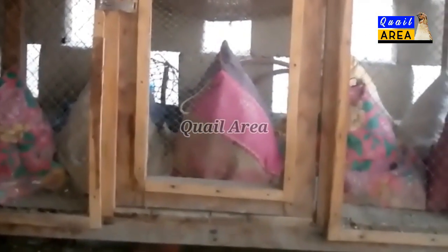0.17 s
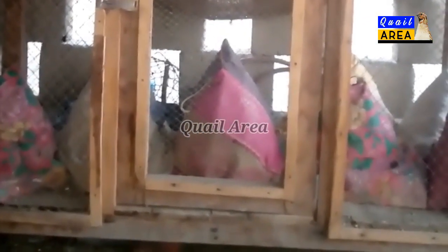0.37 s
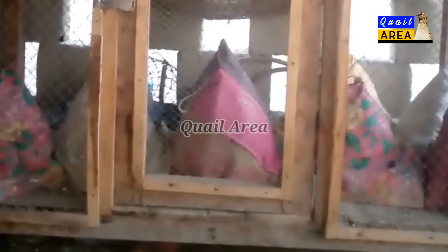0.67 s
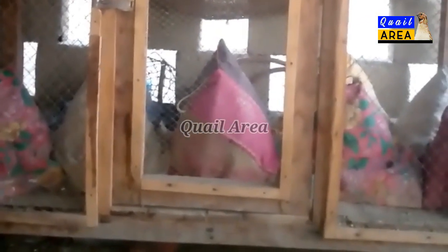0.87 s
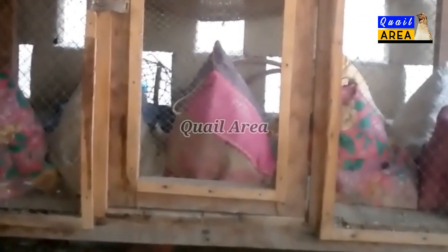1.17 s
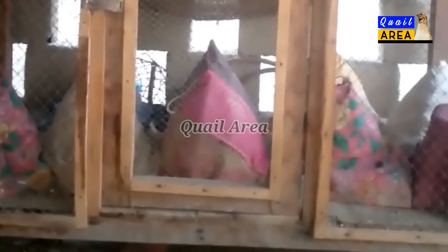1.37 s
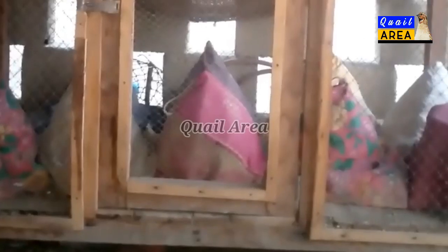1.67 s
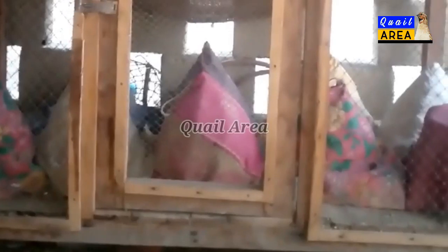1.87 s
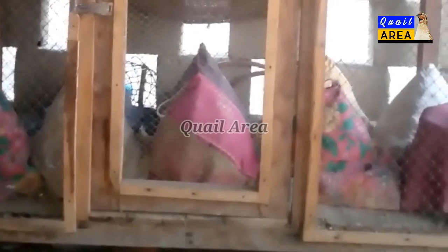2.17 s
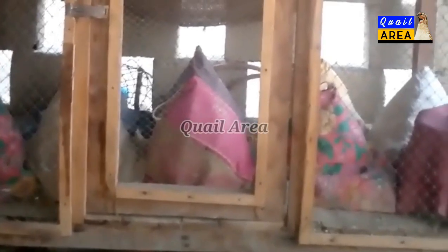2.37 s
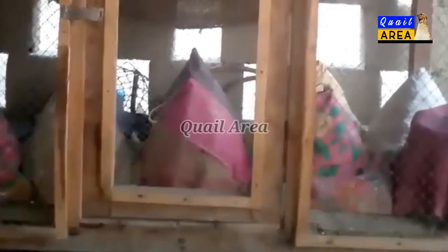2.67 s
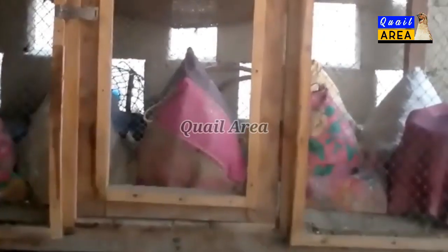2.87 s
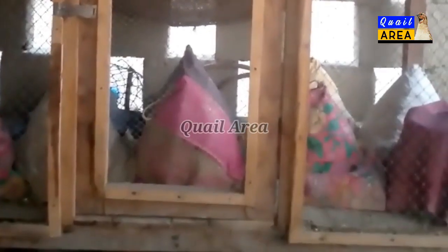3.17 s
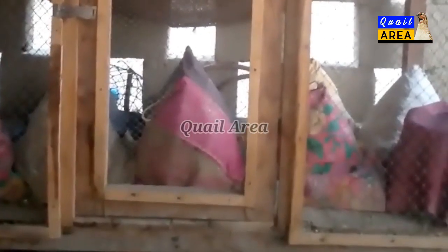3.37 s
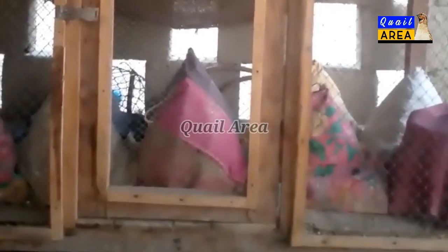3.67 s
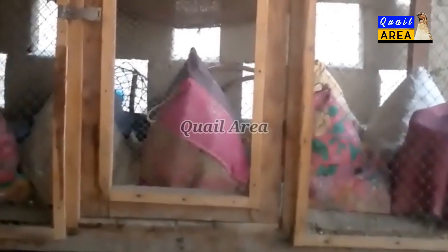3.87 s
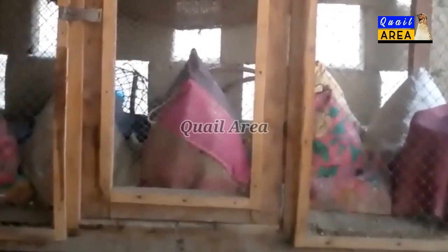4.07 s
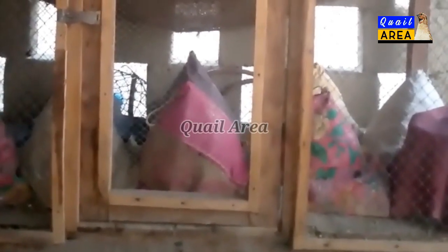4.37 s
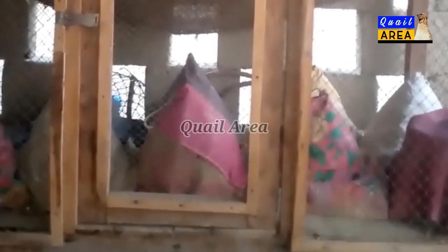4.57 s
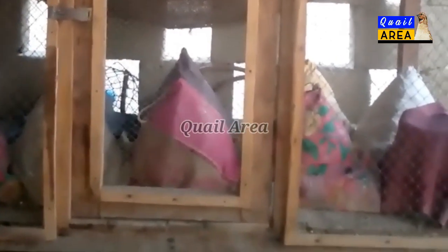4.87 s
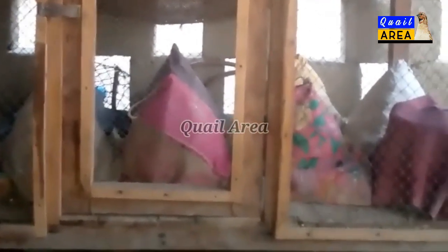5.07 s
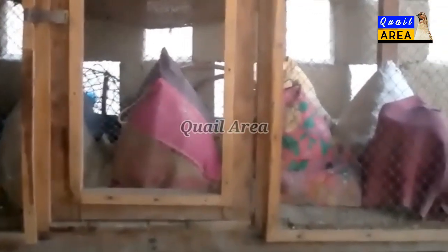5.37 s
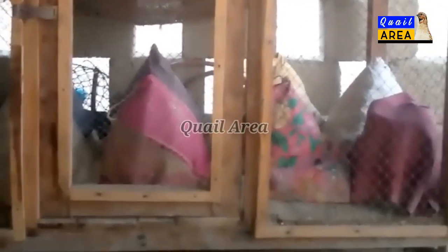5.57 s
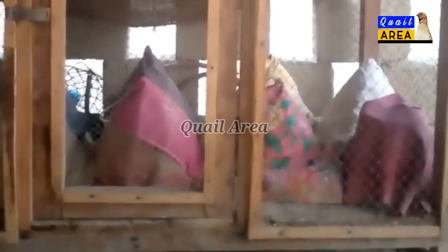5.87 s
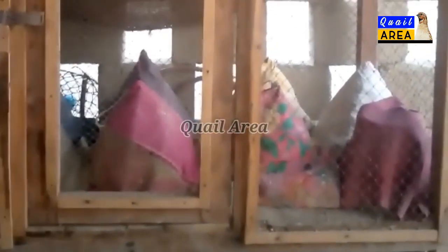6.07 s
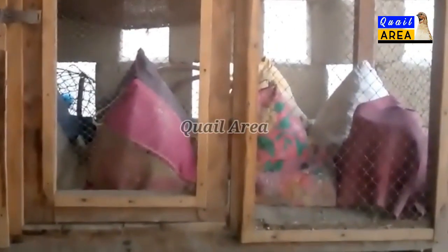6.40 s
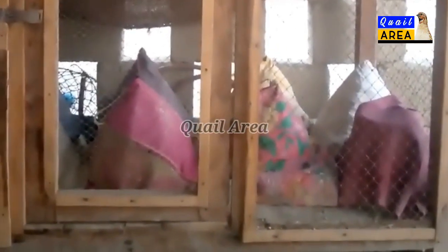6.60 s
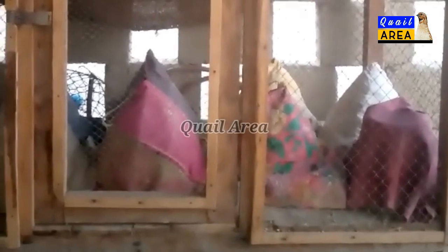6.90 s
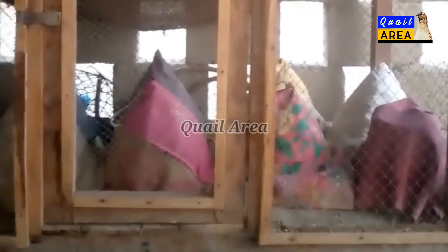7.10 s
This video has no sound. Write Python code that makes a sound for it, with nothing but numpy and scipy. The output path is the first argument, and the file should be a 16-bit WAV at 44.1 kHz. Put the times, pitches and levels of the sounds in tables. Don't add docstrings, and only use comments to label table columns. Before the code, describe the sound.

Close, piercing quail whistles overlap in quick bursts, joined later by rough rolling growls about once a second, with dull wooden knocks and faint chirps.

```python
import sys
import numpy as np
from scipy import signal
from scipy.io import wavfile
from scipy.ndimage import uniform_filter1d

SR = 44100
rng = np.random.default_rng(int(sys.argv[2]) if len(sys.argv) > 2 else 0)


def volts(x):
    e = np.asarray(x, float) / 20
    return 10 ** e


def generate_wav(signal):
    frames = np.transpose(np.atleast_2d(signal))
    scaled = np.clip(frames, -1, 1) * 32767
    pcm = np.round(scaled).astype(np.int16)
    wavfile.write(sys.argv[1], SR, pcm)


N = 319284

# (flick time [s], held length [s], first pitch [Hz], last level [dB], swell [dB])
HIGH_WHISTLES = [(0.08, .069, 3255, -14, -4), (0.3115, 0.046, 3313, -13.5, -10),
                 (0.8369, .073, 3090, -12.5, 10), (1.5681, 0.065, 3402, -14.5, -4),
                 (1.798, 0.059, 3245, -12.5, 14), (1.8389, 0.051, 3178, -12.5, 10),
                 (1.9083, 0.052, 3316, -12.5, -2.5), (2.2005, 0.062, 3194, -11, -1),
                 (3.0696, .07, 3475, -13.5, 5), (3.1098, 0.035, 3339, -15, -4),
                 (3.2808, .079, 3527, -10.5, 2), (3.3333, .055, 3196, -12, 5.5),
                 (3.5691, 0.065, 3198, -10, 1.5), (4.5926, 0.07, 3388, -11, -1.5),
                 (4.6482, 0.028, 3432, -12, -6), (4.8139, 0.047, 3260, -13, -5.5),
                 (4.939, .064, 3202, -11.5, -1.5), (6.0237, 0.087, 3697, -11, 7.5),
                 (6.0742, .058, 3317, -12.5, 6.5), (6.3017, .047, 3267, -9, -4)]


def evened(x):
    return x / np.sqrt(np.mean(x ** 2) + 1e-20)


def read(points, hz):
    f, value = np.transpose(points)
    return np.interp(np.log(hz + 1), np.log(f + 1), value)


def add(mix, s, sound):
    part = mix[max(round(s * SR), 0):][:len(sound)]
    part += sound[:len(part)]


def resonate(x, hz, width):
    turn = np.exp(2j * np.pi * np.cumsum(hz * np.ones(len(x))) / SR)
    r = np.exp(-np.pi * width / SR)
    return 2 * (turn * signal.lfilter([1 - r], [1, -r], x / turn + 1e-18)).real


def echoes(early_db, count):
    # (frequency [Hz], t60 [s])
    decay = [(300, 0.18), (2000, 0.17), (4000, 0.23), (7000, 0.26), (12000, 0.15)]
    taps = np.zeros((count, SR // 3))
    at = np.arange(80, taps.shape[1] - 20, 20)
    at = at + rng.integers(0, 20, (count, len(at)))
    np.put_along_axis(taps, at, rng.choice([-1., 1.], at.shape), axis=1)
    taps *= 1 + volts(early_db - 400 * np.arange(taps.shape[1]) / SR)
    hz, t, z = signal.stft(taps, SR, nperseg=128)
    tails = signal.istft(z * volts(-60 * t / read(decay, hz)[:, None]), SR, nperseg=128)[1]
    return tails / np.linalg.norm(tails, axis=1, keepdims=True)


def shed(x, early_db):
    return signal.oaconvolve(x, echoes(early_db, count=1)[0])[:N]


def bumps():
    # (time [s], peak level [dB], t60 [s], extra level of the deepest board [dB])
    blows = [(0.0, -38.5, 0.7, -8.5), (1.145, -39.5, 0.27, 2.5), (1.212, -41.5, 0.25, 2.5),
             (1.279, -44.5, 0.72, 13), (3.099, -35, 0.16, 0.5), (4.792, -63.5, 0.14, -16),
             (4.92, -41, 1, -19), (4.955, -24, 0.29, 9), (4.999, -31.5, 0.69, 10.5),
             (5.029, -30.5, 0.33, 1.5), (5.082, -23, 0.22, -13.5), (5.156, -34.5, 0.78, -1.5),
             (5.217, -54, 0.1, -11), (5.44, -39, 0.33, -2.5), (6.152, -26, 0.61, -26),
             (6.201, -38.5, 0.44, -24)]
    # (frequency [Hz], width [Hz], level [dB])
    boards = [(110, 35, -3), (203, 47, 2.5), (237, 10, -13), (312.2, 63, -6.5), (520, 220, -28.5)]
    knock = 2.5
    scuff_share = 0.93
    deep, push, scuff = np.zeros((3, N))
    t = np.arange(SR // 2) / SR
    for s, db, t60, deep_db in blows:
        onset = np.minimum(t / 0.0034, 1) * (1 + knock * np.exp(-t / 0.011))
        blow = volts(db - 60 * t / t60) * onset * rng.standard_normal(len(t))
        add(deep, s, volts(deep_db) * blow)
        add(push, s, blow)
        add(scuff, s, blow * volts(-60 * t / (scuff_share * t60)))
    rings = np.zeros(N)
    for k, (hz, width, db) in enumerate(boards):
        drive = deep if k == 0 else push
        rings += volts(db) * resonate(resonate(drive, hz, 2 * width), hz, 2 * width)
    return volts(17.0) * rings + volts(-4.5) * resonate(resonate(scuff, 730, 1600), 730, 1600)


def wash(spectrum, patchy_db):
    a, b, patches = rng.standard_normal((N // 128 + 5, 257, 3)).T
    patches = uniform_filter1d(uniform_filter1d(patches, size=5, axis=0), size=20, axis=1)
    shape_db = read(spectrum, np.fft.rfftfreq(512, 1 / SR))[:, None]
    z = (a + 1j * b) * volts(shape_db + patchy_db * evened(patches))
    return evened(signal.istft(z, nperseg=512, noverlap=384)[1][:N])


def room_air():
    # (frequency [Hz], density [dB per Hz])
    spectrum = [(18, -65), (30, -10.5), (249, -7.5), (1130, -19), (2900, -15), (3400, -10), (6200, -22.5),
                (7840, -39), (11900, -45), (12900, -28.5), (15500, -50)]
    return volts(-52 + 6) * wash(spectrum, patchy_db=2.0)


def bursts(t, s, db, fall_db_per_s):
    rise_db_per_s = 383
    late = t - np.asarray(s)[:, None]
    swell_db = np.minimum(rise_db_per_s * late, -fall_db_per_s * late)
    return volts(np.asarray(db)[:, None] + swell_db) ** 2


def far_cages():
    # (time [s], level [dB], centre [Hz])
    far_calls = [(.0, -42, 3290), (0.46, -44.5, 3400), (0.931, -42, 3306), (1.311, -44.5, 4430),
                 (1.388, -42.5, 3685), (1.479, -45, 6080), (2.502, -49.5, 4530), (2.622, -50.5, 3620),
                 (2.859, -63.5, 5910), (3.87, -51, 6020), (4.27, -44, 3020), (4.45, -37.5, 3210),
                 (5.22, -51, 3690), (5.482, -42, 3974), (5.542, -45, 3503), (5.75, -46.5, 3610),
                 (6.529, -41.5, 4033), (6.598, -46.5, 3403), (7.2, -45, 3383)]
    # (frequency [Hz], density [dB per Hz])
    high_spectrum = [(1800, -35.5), (2600, -23), (3300, -7.5), (6300, -7), (7200, -21), (10000, -59.5)]
    # (frequency [Hz], density [dB per Hz])
    low_spectrum = [(410, -53), (700, -33), (862, -9), (1070, -17), (1420, 2), (1950, -10.5), (2600, -29.5),
                    (3380, -41.5), (5720, -120)]
    linger_db, linger_hz, lull_db, patchy_db = -21, 3300, -63, 4.0
    t = np.arange(0, N / SR, .005)
    s, db, hz = np.transpose(far_calls)
    high = np.transpose(HIGH_WHISTLES)
    calls = bursts(t, s, db, fall_db_per_s=105.5)
    linger = bursts(t, high[0], high[3] + linger_db, fall_db_per_s=75.5).sum(0) + volts(lull_db) ** 2
    centre_hz = (hz @ calls ** 2 + linger_hz * linger ** 2) / ((calls ** 2).sum(0) + linger ** 2)
    gain = np.sqrt(calls.sum(0) + linger)
    gain, centre_hz = (np.interp(np.arange(N) / SR, t, c) for c in (gain, centre_hz))
    blur = wash(high_spectrum, patchy_db)
    coloured = resonate(resonate(blur, centre_hz, 1400), centre_hz, 1400)
    return gain * evened(0.15 * blur + coloured) + volts(-74.5) * wash(low_spectrum, patchy_db)


def whistles(rows, flick, tone, hold, wall_db=-60):
    wall_s = .0115
    settle = .45
    thin_db_per_octave = 10.5
    second_db, third_db, direct_db, shed_db, share, early_db = tone
    after, flick_hz, flick_db = np.transpose(flick)
    out = np.zeros(N)
    tails = volts(shed_db) * echoes(early_db, count=6)
    tails[:, 0] += volts(direct_db)
    tails[:, round(wall_s * SR)] += volts(direct_db + wall_db)
    for k, (s, held, first_hz, last_db, swell_db) in enumerate(rows):
        lead = min(held + 0.0069, s)
        first_db = last_db - swell_db
        middle_hz = hold[0] + hold[1] * (first_hz - hold[0])
        middle_db = first_db + share * swell_db
        t = np.arange(-lead, after[-1], 1 / SR)
        start = .007 - held
        knots = np.r_[-lead, start, start + settle * (after[0] - start), after]
        hz = np.interp(t, knots, np.r_[first_hz, first_hz, middle_hz, flick_hz])
        db = np.interp(t, knots, np.r_[first_db - 18, first_db, middle_db, last_db + flick_db])
        turn = 2 * np.pi * np.cumsum(uniform_filter1d(hz, size=60)) / SR
        thin = volts(-thin_db_per_octave * np.maximum(np.log2(hz / flick_hz[1]), 0))
        overtones = volts(second_db) * np.sin(2 * turn) + volts(third_db) * np.sin(3 * turn)
        note = np.sin(turn) + thin * overtones
        note = np.sqrt(2) * volts(uniform_filter1d(db, size=40)) * note * signal.windows.tukey(len(t), .05)
        add(out, s - lead, signal.fftconvolve(note, tails[k % len(tails)]))
    return out


def swelling(rows, swell):
    return [(*row, swell[0] + swell[1] * row[1]) for row in rows]


def high_whistles():
    # (time from its centre [s], pitch [Hz], level from the held note [dB])
    flick = [(-.018, 3340, -6.5), (-.010, 3476, 3.5), (-.005, 3540, -3.5), (0, 4280, -4), (.004, 6070, -3),
             (.009, 6596, -17), (0.016, 6930, -12)]
    # (flick time [s], held length [s], first pitch [Hz], last level [dB], swell [dB])
    farther = [(.1289, .039, 3180, -22.5, 1.5), (.3545, .038, 3117, -17.5, 15),
               (.5544, .078, 3520, -14.5, 10), (.652, 0.061, 3186, -42, 14.5),
               (1.6139, 0.063, 3375, -18, -7), (2.298, 0.021, 3315, -44, 12.5),
               (5.036, 0.064, 3184, -43, 2), (6.184, 0.035, 3126, -30, -10),
               (6.3274, 0.029, 3604, -14.5, 7), (7.177, .096, 3684, -16, 10)]
    # (time from its centre [s], pitch [Hz], level from the held note [dB])
    far_flick = [(-.018, 3310, 0), (-.010, 3250, 4), (-.005, 3570, 0), (0, 4713, -3.5), (.004, 5950, -4.5),
                 (.009, 6260, -11), (0.018, 6430, -30.5)]
    close = whistles(HIGH_WHISTLES, flick, (-27, -66, -4, -2.5, 1.21, 2), (3240, 0.14), wall_db=-7.5)
    return close + whistles(farther, far_flick, (-33, -59, -1, -2, 0.88, 5), (3150, 0.039))


def distant_calls():
    # (time [s], length [s], first pitch [Hz], throat [Hz], level [dB])
    calls = [(0.326, 0.087, 776, 765.7, -54), (1.671, 0.14, 705, 700, -50.5), (2.5, 0.17, 295, 1449, -52),
             (2.58, 0.15, 302, 712, -57), (2.829, .078, 392, 372, -56.5), (3.771, 0.21, 499, 1940, -49.5),
             (3.849, 0.12, 275, 265, -71.5), (4.444, 0.14, 505, 1370, -43), (4.909, 0.078, 1650, 1581, -48),
             (5.434, .25, 499, 1820, -43.5), (5.696, 0.1, 2930, 2790, -51),
             (6.828, 0.053, 2880, 2640, -40.5)]
    sag_per_s = 0.5
    out = np.zeros(N)
    for s, length, first_hz, throat_hz, db in calls:
        count = round(length * SR)
        waver = 1 + .03 * evened(uniform_filter1d(rng.standard_normal(count), size=200))
        hz = first_hz * np.linspace(1, 1 - sag_per_s * length, count) * waver
        turn = 2 * np.pi * np.cumsum(hz) / SR
        pulses = sum(np.cos(k * turn) for k in range(1, 8))
        pulses = pulses * (1 + .6 * rng.standard_normal(count))
        call = resonate(resonate(pulses, throat_hz, 1200), throat_hz, 1200)
        add(out, s, volts(db) * evened(call) * signal.windows.tukey(count, .6))
    return volts(-9) * out + shed(out, early_db=0)


def middle_whistles():
    # (flick time [s], held length [s], first pitch [Hz], last level [dB])
    firm = [(.7667, 0.03, 2224, -12.5), (1.5143, 0.023, 2141, -18), (1.9302, 0.037, 2331, -12.5),
            (3.4433, 0.05, 2305, -18.5), (4.0953, 0.018, 2350, -15), (4.5137, 0.034, 2127, -15),
            (5.193, 0.035, 2100, -16), (5.6092, 0.031, 2212, -14), (6.7435, 0.035, 2177, -14)]
    # (flick time [s], held length [s], first pitch [Hz], last level [dB])
    soft = [(.351, 0.028, 2030, -20.5), (.9907, 0.051, 2060, -22), (2.153, 0.035, 2144, -19),
            (3.6757, 0.039, 2053, -19.5), (4.7366, 0.041, 2045, -20.5), (5.826, 0.037, 2117, -23),
            (6.9622, 0.033, 2180, -24.5)]
    # (time from its centre [s], pitch [Hz], level from the held note [dB])
    flick = [(-.010, 2602, 4), (-.005, 2820, -4), (0, 3457, 2.5), (.003, 4610, -5.5), (.007, 4850, -5.5),
             (0.013, 4766, -19.5)]
    # (time from its centre [s], pitch [Hz], level from the held note [dB])
    soft_flick = [(-.010, 2581, 4), (-.005, 2734, 1), (0, 3360, 2), (.003, 4134, -4), (.007, 4750, -12.5),
                  (0.011, 4900, -28)]
    swell, hold = (-17, 800), (2300, 0.28)
    out = whistles(swelling(firm, swell), flick, (-28, -38.5, -1, -4.5, 1.0049, -6), hold)
    return out + whistles(swelling(soft, swell), soft_flick, (-37.5, -49, -2, -5.5, 1.1671, -8), hold)


def near_whistles():
    # (flick time [s], held length [s], first pitch [Hz], last level [dB], swell [dB])
    light = [
        (.707, 0.033, 1137, -11.5, 28),
    ]
    # (time from its centre [s], pitch [Hz], level from the held note [dB])
    light_flick = [(-.014, 1750, -11), (-.009, 1900, 2.5), (-.0055, 2050, 3), (-.0022, 2400, 0),
                   (0, 2900, 9.5), (.0015, 3600, 7.5), (.003, 4500, -16)]
    # (flick time [s], held length [s], first pitch [Hz], last level [dB])
    full = [(.9211, .034, 1400, -4.5), (1.0508, 0.029, 1308, -4), (1.743, .026, 1512, -4),
            (1.9484, 0.031, 1440, -2.5), (2.0775, 0.044, 1280, -2.5), (2.763, 0.024, 1517, -5.5),
            (2.973, .033, 1413, -2.5), (3.1004, 0.023, 1281, -0.5)]
    # (time from its centre [s], pitch [Hz], level from the held note [dB])
    flick = [(-.017, 1780, -9), (-.013, 1930, 2), (-.008, 2050, 4), (-.0045, 2200, 1), (-.0022, 2500, -13),
             (-.0008, 2900, 2), (.0012, 3650, 2), (.003, 4700, -16)]
    tone, hold = (-27.5, -55, -0.5, -17.5, 0.16, 28), (1780, .68)
    out = whistles(light, light_flick, tone, hold)
    return out + whistles(swelling(full, (21, 40)), flick, tone, hold)


def growls(rows, shape, apart, rough, mixing, throat_width, chest_db, shed_db, merged=0):
    joint_partials = [(2, 1, .7), (1, 2, .3), (2, 2, 1.), (3, 1, .4), (1, 4, .5)]
    open_hz = (1500, 2100)
    throb = .2
    spill_db = -12.5
    spread, chest_ratio = .15, 2.12
    out = np.zeros(N)
    u, *columns = np.transpose(shape)
    for s, longer, higher, level_db in rows:
        t = np.arange(0, u[-1] * longer, 1 / SR)
        hz, throat_hz, db = (uniform_filter1d(np.interp(t / longer, u, c), size=300) for c in columns)
        sides, turns = [], []
        for ratio in (higher, higher * apart):
            jitter = 1 + 0.012 * evened(uniform_filter1d(rng.standard_normal(len(t)), size=120))
            turn = 2 * np.pi * np.cumsum(hz * ratio * jitter) / SR
            turns.append(turn)
            sides.append(sum(np.cos(k * turn + spread * k * k) / np.sqrt(k) for k in range(1, 8)))
        sums = sum(w * np.cos(j * turns[0] + m * turns[1] + j * m) for j, m, w in joint_partials)
        drive = evened(sides[0] + sides[1] + merged * sums + mixing * sides[0] * sides[1])
        source = drive + rough * np.abs(drive) * rng.standard_normal(len(t))
        throat = source
        for _ in range(3):
            throat = resonate(throat, throat_hz, throat_width)
        opened = np.interp(throat_hz, open_hz, (0, 1))
        breath = np.abs(drive) * rng.standard_normal(len(t))
        spill = resonate(resonate(breath, 1.2 * throat_hz, 1400), 1.1 * throat_hz, 1400)
        pinch = 1 + throb * opened * np.cos(turns[1] - turns[0])
        throat = (throat + volts(spill_db) * opened * spill) * pinch
        chest = resonate(resonate(source, chest_ratio * hz, 690), chest_ratio * hz, 600)
        voice = evened(throat + volts(chest_db) * chest)
        add(out, s, volts(db + level_db) * voice * signal.windows.tukey(len(t), .05))
    return out + volts(shed_db) * shed(out, early_db=18.5)


def soft_rasps():
    # (time [s], length factor, pitch factor, level [dB])
    rasps = [(.787, 0.87, 1.23, -4), (3.465, 1.09, 1.08, -10.5), (4.535, 1.02, 1.15, -3),
             (5.63, 1.01, 1.3, -7.5), (6.762, 1.06, 1.04, -8.5)]
    # (time from its start [s], pitch [Hz], throat [Hz], level [dB])
    course = [(0, 637.7, 2377, -55), (0.019, 633.3, 1970, -28.5), (0.044, 623.5, 1522, -46.5),
              (.07, 680, 1268, -59.5), (.09, 693, 1382, -49), (.13, 692, 1450, -48.5),
              (0.154, 840, 1916, -34.5), (.17, 913, 2040, -44.5)]
    return growls(rasps, course, apart=1.03, rough=1.0, mixing=.1, throat_width=760,
                  chest_db=-26.0, shed_db=0.0)


def near_rasps():
    # (time [s], length factor, pitch factor, level [dB])
    rasps = [
        (.94, 1.06, 0.9, 4),
        (1.972, 1.004, 0.97, 6.5),
        (2.995, 1.01, 1.01, 8.5),
    ]
    # (time from its start [s], pitch [Hz], throat [Hz], level [dB])
    course = [(0, 519, 2948, -33.5), (0.014, 531, 2813, -25), (0.033, 580.6, 2150, -19.5),
              (0.051, 541.7, 1731, -23), (.068, 570, 1150, -27), (.08, 640, 1280, -31),
              (0.088, 694, 1400, -34)]
    return growls(rasps, course, apart=1.025, rough=.35, mixing=0.1, throat_width=560,
                  chest_db=-13, shed_db=-8.0)


def outside_chirps():
    # (time [s], length [s], first pitch [Hz], last pitch [Hz], level [dB])
    chirps = [(1.19, 0.026, 4620, 5340, -59), (2.375, .07, 3350, 2497, -58),
              (2.44, 0.095, 2455, 2200, -57.5), (2.6, .08, 2900, 3247, -53),
              (2.82, 0.12, 6480, 4610, -57.5), (3.76, 0.1, 5800, 4290, -55),
              (3.84, 0.018, 6500, 5360, -50.5), (3.89, 0.09, 6420, 5870, -60),
              (3.975, 0.052, 3633, 4226, -56.5), (5.74, 0.1, 6500, 4680, -57.5),
              (6.5, .04, 4900, 6020, -52), (6.78, .05, 6530, 6135, -52.5), (7.0, .09, 4800, 5420, -61)]
    out = np.zeros(N)
    for s, length, first_hz, last_hz, db in chirps:
        count = round(length * SR)
        chirp = resonate(rng.standard_normal(count), np.geomspace(first_hz, last_hz, count), 90)
        add(out, s, volts(db) * evened(chirp) * signal.windows.tukey(count, .5))
    return out + volts(-3) * shed(out, early_db=5)


def long_growls():
    # (time [s], length factor, pitch factor, level [dB])
    calls = [
        (3.11, 0.94, 0.91, -1.4),
        (4.07, 0.99, 0.99, 0.1),
        (5.045, 0.99, 1.032, 0.4),
        (6.055, 0.96, 1.01, 0.3),
        (7.075, 0.95, 1.02, 0.5),
    ]
    # (time from its start [s], pitch [Hz], throat [Hz], level [dB])
    course = [(0, 441.2, 1058, -45.5), (0.036, 461.1, 1150, -28.5), (0.084, 505, 2160, -22.5),
              (0.14, 533.5, 2200, -21.5), (0.161, 556.3, 1083, -26.5), (0.226, 592.7, 1250, -22.5),
              (.28, 598.2, 3040, -13.5), (.33, 564.9, 2274, -15.5), (0.374, 520, 1483, -24)]
    return growls(calls, course, apart=1.125, rough=.5, mixing=.3, throat_width=680,
                  chest_db=-10, shed_db=-13, merged=1.1)


def scene():
    background = room_air() + far_cages() + distant_calls() + outside_chirps()
    notes = high_whistles() + middle_whistles() + near_whistles()
    rough_voices = soft_rasps() + near_rasps() + long_growls()
    return (bumps() + background + notes + rough_voices)[None]


def shifting_bands(x):
    split_hz = 7200
    gate_db, gate_range_db = -9, 9
    wide_from_db = -51.5
    hush_db, hush_from_db = -8, -46
    hz, _, z = signal.stft(x, SR, nperseg=2048, noverlap=1536)
    treble = hz[:, None] > split_hz
    off_whine = abs(hz[:, None] - 12700) > 330
    power = np.abs(z) ** 2
    outline = np.sqrt(np.abs(uniform_filter1d(power, size=16, axis=0)))

    steady_db = 10 * np.log10(uniform_filter1d(outline ** 2, size=3, axis=1) + 1e-16)
    above_db = steady_db - np.percentile(steady_db[:, ::4], 15, axis=1)[:, None]
    z = z * volts(gate_db * np.clip(1 - above_db / gate_range_db, 0, 1.3) * off_whine)

    a, b = rng.standard_normal((z.shape[1], len(hz), 2)).T
    overload = 10 * np.log10(power[(hz > 1500) & (hz < 2500)].sum(0) + 1e-12) > -18
    bands_db = rng.uniform(-16, 0, (35, z.shape[1] // 4 + 1))
    bands_db = np.repeat(np.repeat(bands_db, 30, axis=0), 4, axis=1)
    outline = outline * volts(bands_db[:len(hz), :z.shape[1]])
    z = np.where(treble & overload, volts(10.0) * outline * (a + 1j * b), z)

    broad_db = 10 * np.log10(np.median(power[(hz > 900) & (hz < 3400)], 0) + 1e-14)
    dimmed = volts(-2.5 * np.maximum(broad_db - wide_from_db, 0) * ~overload)
    z = np.where(treble | (hz[:, None] < 420), z * dimmed, z)

    low_db = 10 * np.log10(power[(hz > 950) & (hz < 1400)].sum(0) + 1e-12)
    hushed = volts(hush_db * np.clip((low_db - hush_from_db) / 5, 0, 1) * ~overload)
    z = np.where(treble & off_whine, z * hushed, z)
    return signal.istft(z, SR, nperseg=2048, noverlap=1536)[1][:N]


def whine():
    # (frequency [Hz], level [dB])
    tones = [
        (12462, -71),
        (12909, -72.5),
    ]
    out = np.zeros(N)
    for hz, db in tones:
        fuzz = evened(resonate(rng.standard_normal(N), hz, 40))
        out += volts(db) * evened(np.sin(2 * np.pi * hz * np.arange(N) / SR) + .25 * fuzz)
    return out


def band_limit(x):
    return signal.sosfilt(signal.butter(12, 15610, fs=SR, output="sos"), x)


def record(dry):
    # (frequency [Hz], gain [dB])
    response = [(100, -6.5), (6700, 1.5), (7300, 1.5), (10500, 0.5), (12500, 0), (14500, -6.5),
                (15500, -8.5), (16000, -37)]
    ceiling, hiss_db = .99, -58.5
    loaded = np.clip(dry[0] + volts(hiss_db) * rng.standard_normal(N), -ceiling, ceiling)
    hz = np.linspace(0, SR / 2, 257)
    microphone = signal.firwin2(255, hz, volts(read(response, hz)), fs=SR)
    coloured = signal.oaconvolve(loaded, microphone, "same") + whine()
    mix = np.clip(shifting_bands(coloured), -1, 1)[None]
    return band_limit(mix)


dry = scene()
out = record(dry)
generate_wav(out)
```